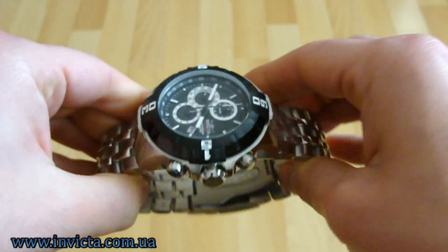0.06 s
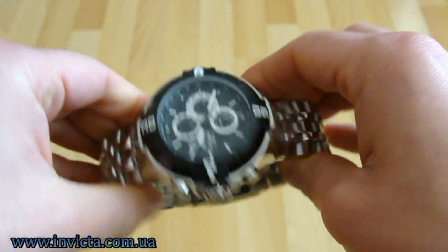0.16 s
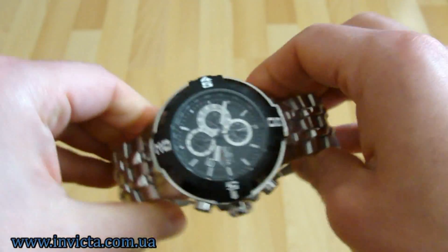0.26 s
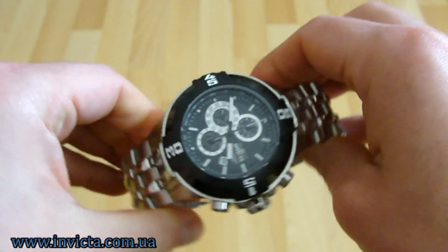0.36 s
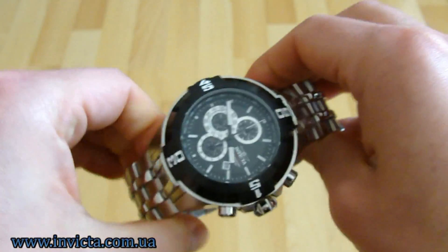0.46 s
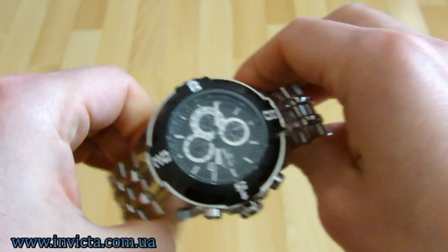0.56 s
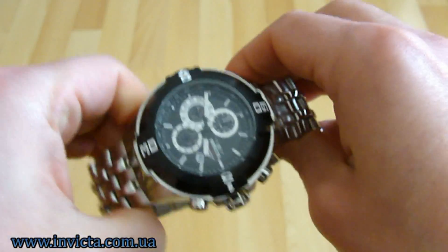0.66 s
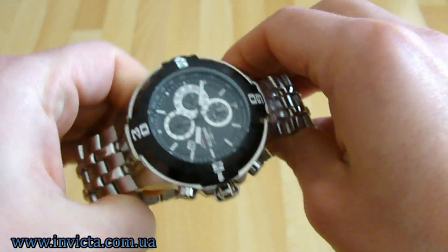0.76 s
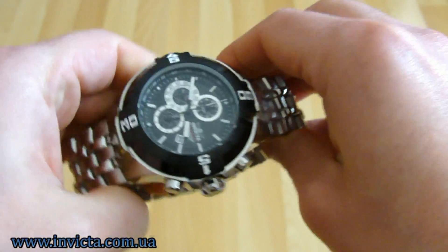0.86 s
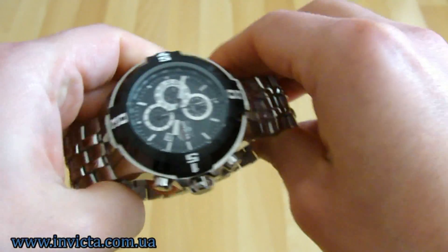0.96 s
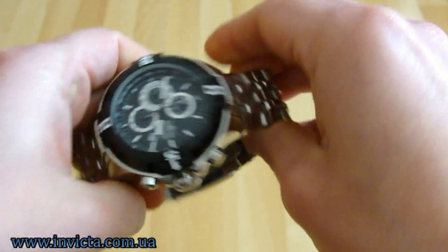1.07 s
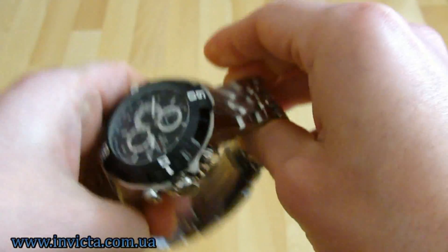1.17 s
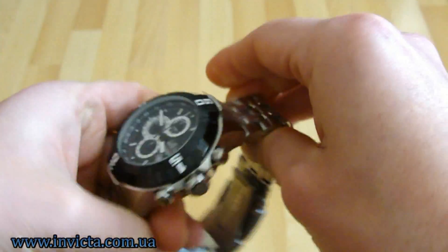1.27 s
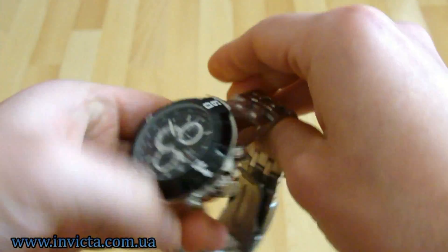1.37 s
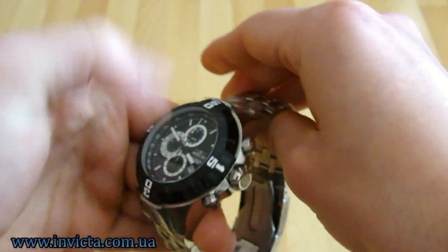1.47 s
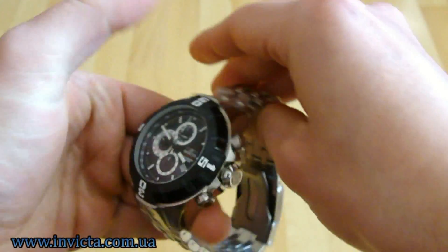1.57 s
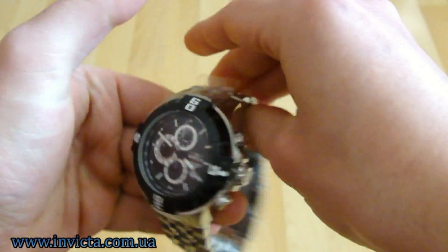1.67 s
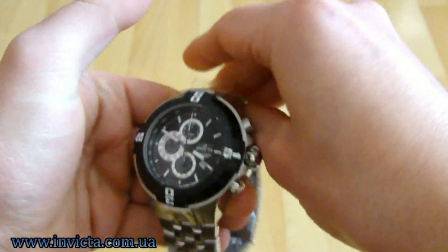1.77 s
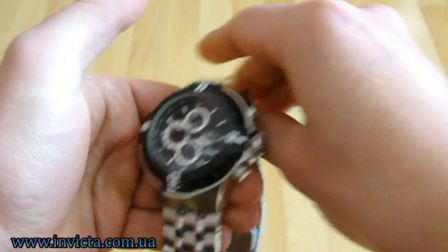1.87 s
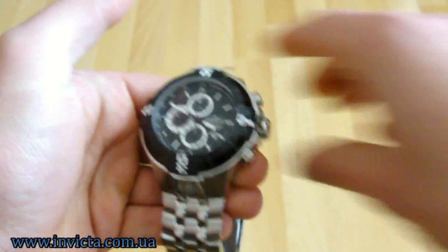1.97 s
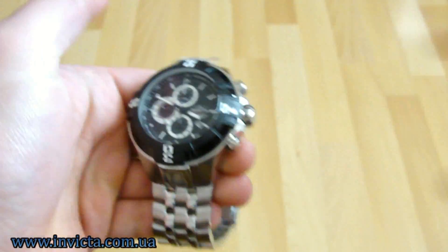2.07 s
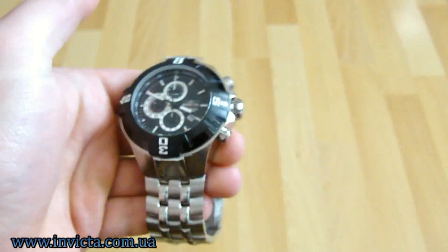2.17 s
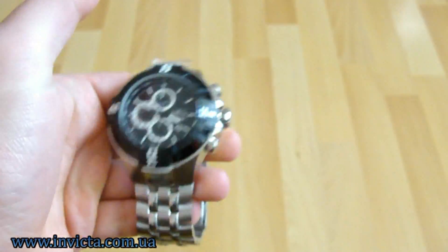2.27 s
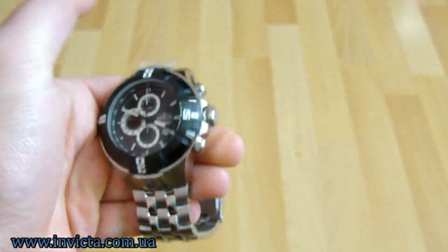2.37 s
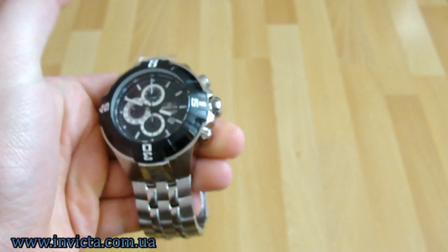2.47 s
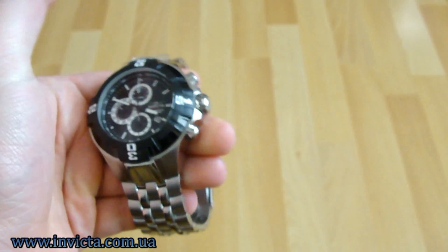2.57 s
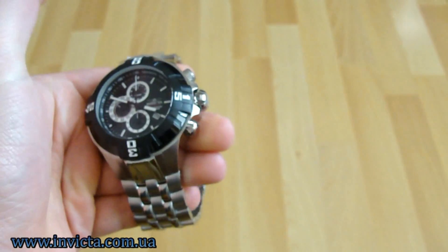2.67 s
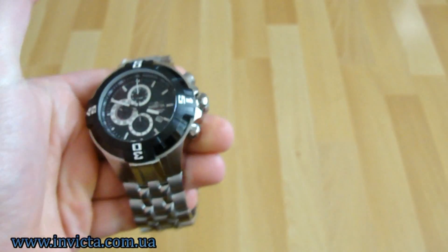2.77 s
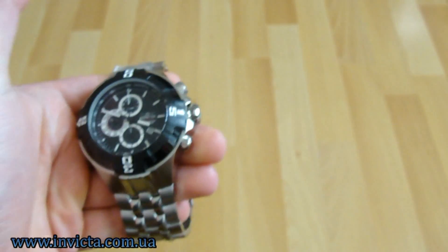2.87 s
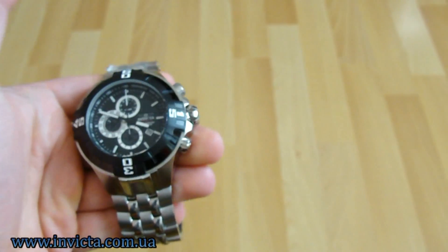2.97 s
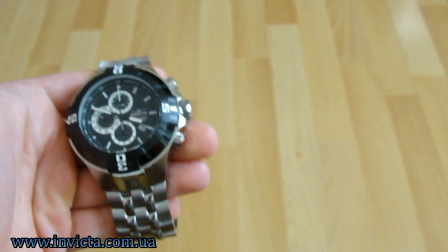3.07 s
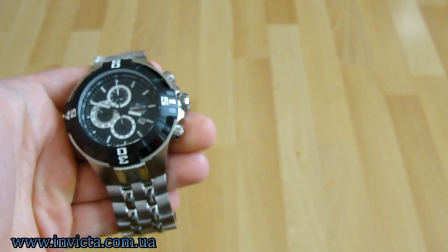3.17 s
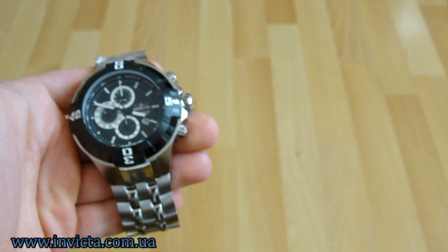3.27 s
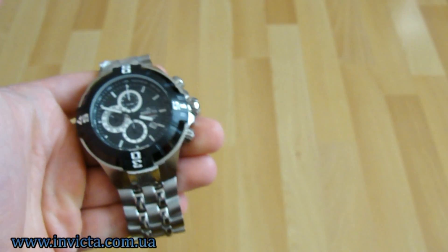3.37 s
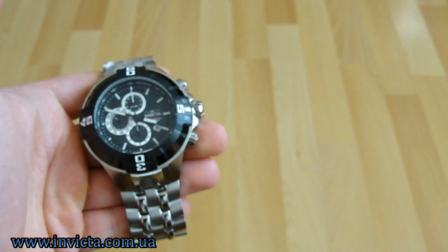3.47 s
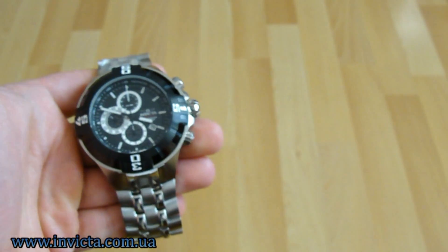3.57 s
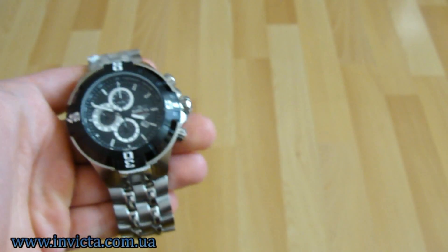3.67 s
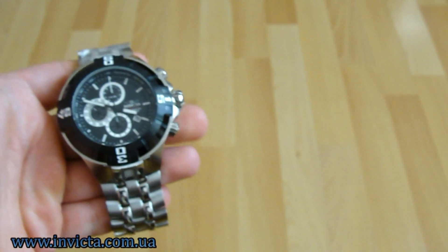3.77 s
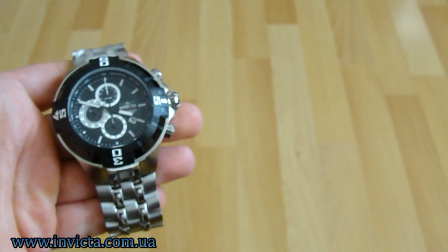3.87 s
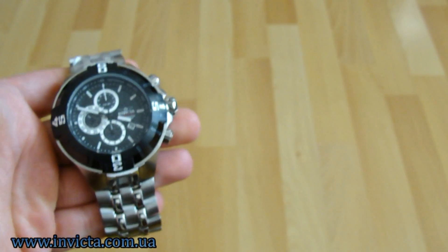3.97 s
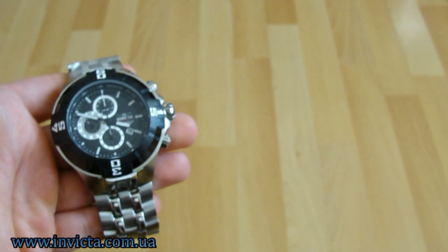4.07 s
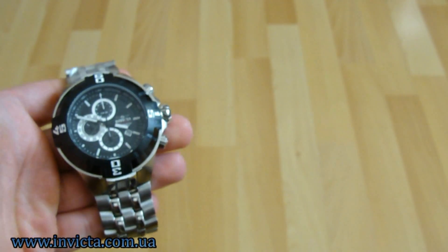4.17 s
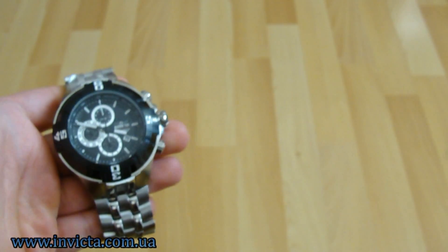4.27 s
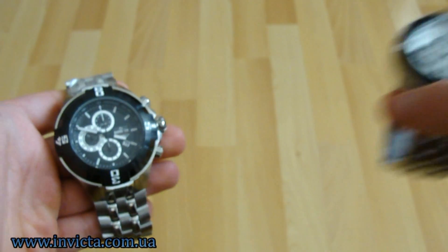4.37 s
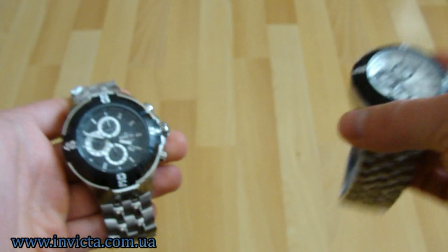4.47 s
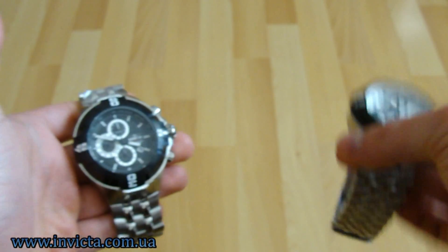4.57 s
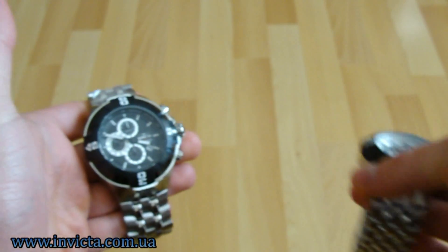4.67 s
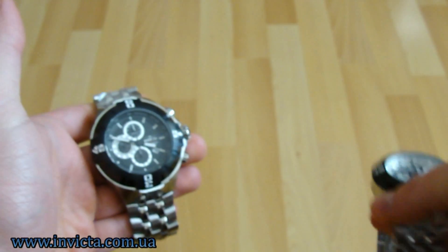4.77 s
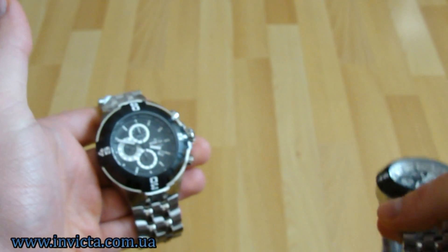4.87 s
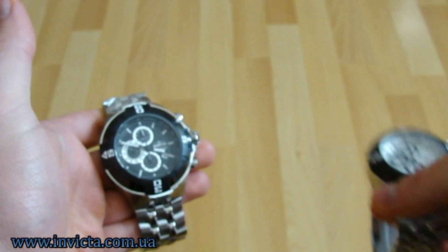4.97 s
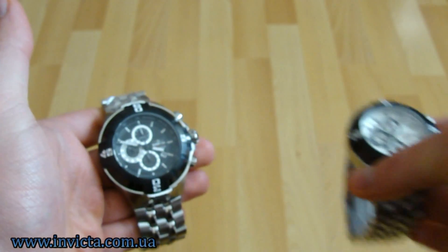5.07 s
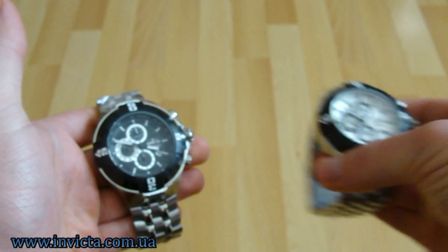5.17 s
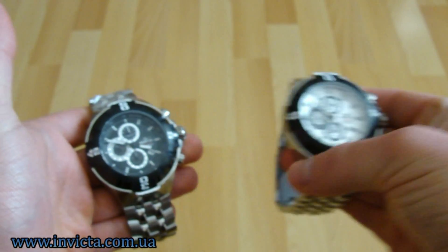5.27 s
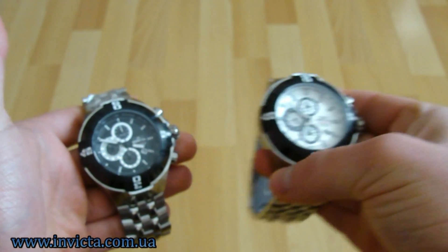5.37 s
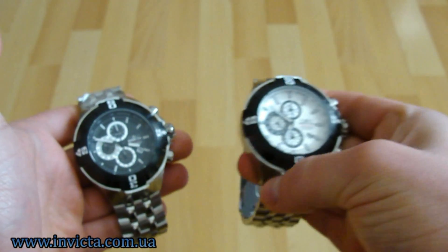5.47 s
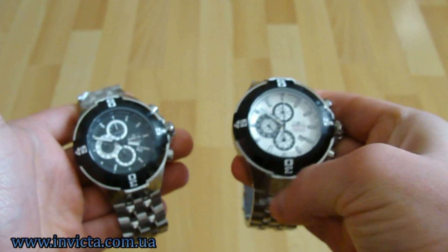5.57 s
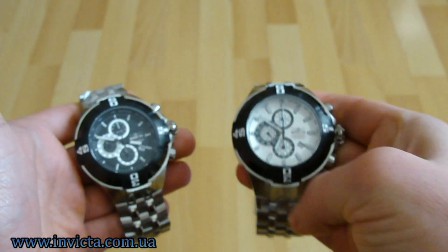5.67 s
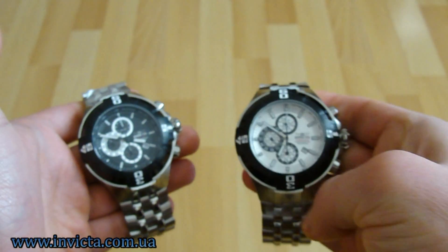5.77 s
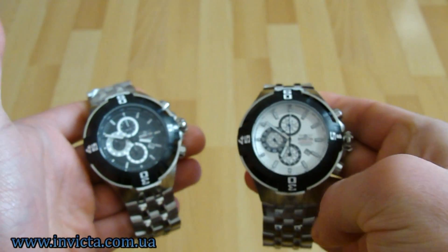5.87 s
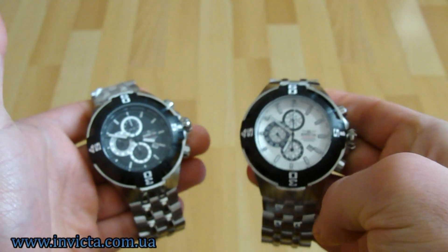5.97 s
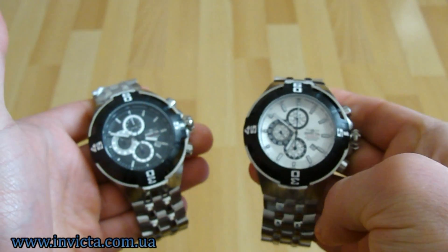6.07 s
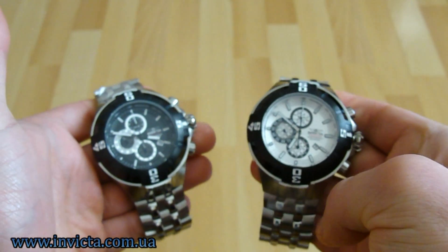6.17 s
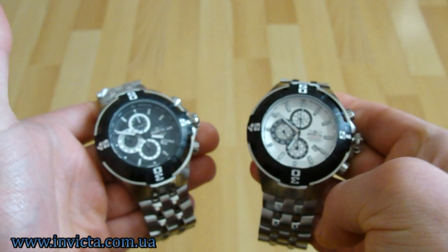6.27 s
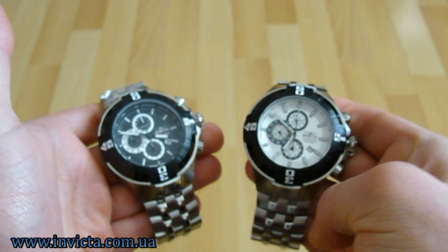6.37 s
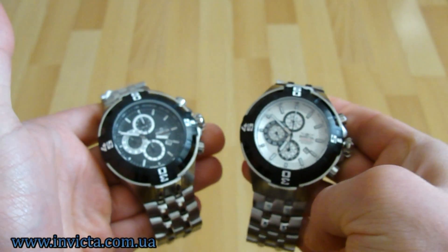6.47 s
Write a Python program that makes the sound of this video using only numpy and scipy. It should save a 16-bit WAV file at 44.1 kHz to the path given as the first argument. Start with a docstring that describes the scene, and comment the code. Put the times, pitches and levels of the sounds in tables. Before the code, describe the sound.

A steady machine hum and microphone hiss open the scene and continue throughout. At about 1.1 seconds, steel link watch bracelets begin to move in the hands: the links slide in a fine, high rattle and knock in short, damped clinks. These build to the loudest, sharpest cluster between 1.7 and 1.9 seconds. A brief rattle and clink follow near 2.1, and another near 2.5. Around 3 seconds there is a lull, with one soft bump of a watch case against the palm. From about 3.5 to 5.4 seconds comes a longer run of sliding rattles and clinks, with sharper clicks near 4.3, 4.4 and 4.8. It thins to a single clink near 5.7, a faint bump, and a last light clink and bump just after 6 seconds. Everything is close to a small mono microphone in a quiet room with slight, short reverberation.

```python
"""Steel link watch bracelets are handled close to a small mono microphone in a quiet room.
A steady machine hum and microphone hiss open the scene and lie under all of it. After a second the
bracelets are picked up: links slide in a fine rattle and knock in short damped clinks, loudest just
before 2 s, and the case bumps the palm. After a lull near 3 s they are turned in the hands in a longer
run of rattles and clinks, which thins out to a last clink and bump just after 6 s."""
import sys
import numpy as np
from scipy import signal
from scipy.fft import rfft, irfft, next_fast_len
from scipy.io import wavfile

SR = 44100
rng = np.random.default_rng(int(sys.argv[2]) if len(sys.argv) > 2 else 0)


def transcribe(signal):
    """Save signal, clipped to [-1, 1], as a 16-bit WAV file at the path in sys.argv[1]."""
    frames = np.atleast_2d(signal).T
    limited = np.clip(frames, -1, 1)
    pcm = np.round(limited * 32767).astype(np.int16)
    wavfile.write(sys.argv[1], SR, pcm)


N = 287607


def from_db(db):
    """Decibels to gain."""
    return 10 ** (np.asarray(db) / 20)


def ring(clicks, hz, t60):
    """A resonator: each click sets a decaying sine ringing."""
    r, w = from_db(-60 / (t60 * SR)), 2 * np.pi * hz / SR
    return signal.lfilter([0, np.sin(w)], [1, -2 * r * np.cos(w), r * r], clicks + 1e-18)


def damped(hz, t60, size=4000):
    """Decaying sines, one a row."""
    t = np.arange(size) / SR
    return np.sin(2 * np.pi * np.outer(hz, t)) * from_db(-60 * t / np.reshape(t60, (-1, 1)))


def add(out, start_s, sound):
    """Mix a sound in at its start time."""
    i = round(start_s * SR)
    out[i:i + len(sound)] += sound[:N - i]


# Tone curve of the background bed: frequency_hz, relative_db
BED_CURVE = [(15, -58), (25, -27), (212, -5.5), (247, -6), (303, -3.5), (381, -4), (651, -3), (740, -2),
             (1060, -2), (1850, -9), (2210, -10), (3770, -12), (11000, -20), (14300, -53), (22000, -120)]
# Narrow resonances of the machine: centre_hz, width_hz, lift_db
MACHINE_BANDS = [(602, 48, 2.5), (626, 23, 3.5), (1080, 45, 0.5), (1398, 37, 9.5), (1856, 130, 6.5),
                 (3266, 130, 5), (3770, 79, 8)]


def hum_and_hiss(level_db=-55):
    """Machine hum and microphone hiss: steady coloured noise with a few resonant bands."""
    size = next_fast_len(N)
    hz = np.maximum(np.arange(size // 2 + 1) * SR / size, 1)
    curve_hz, curve_db = np.transpose(BED_CURVE)
    eq_db = np.interp(np.log(hz), np.log(curve_hz), curve_db)
    for centre_hz, width_hz, lift_db in MACHINE_BANDS:
        eq_db += lift_db / (1 + (2 * (hz - centre_hz) / width_hz) ** 2)
    bed = irfft(rfft(rng.standard_normal(size)) * from_db(eq_db), size)[:N]
    return from_db(level_db) * bed / np.sqrt(np.mean(bed ** 2))


# Steel modes of the bracelet, voicing both rattle and clinks: pitch_hz, gain_db, t60_ratio
LINK_MODES = [(1800, -15, 0.44), (2265, -10.5, 2.5), (3030, -1, 1.26), (3360, -1.5, 1.08), (3950, 6, 0.69),
              (4570, 4, 0.68), (5200, 0, 0.91), (5900, -3.5, 1.9), (6600, -2, 1.27), (7150, -3.5, 1),
              (7760, -3, 1.04), (8820, 1.5, 0.47), (9320, -1.5, 1.07), (9970, -2, 1.3), (11250, 0.5, 1.03)]


def link_rattle(ticks, centre_hz, drop_db):
    """Each tiny tick rings one random link mode; modes away from the centre are turned down."""
    struck_mode = rng.integers(0, len(LINK_MODES), N)
    out = np.zeros(N)
    for k, (hz, mode_db, t60_ratio) in enumerate(LINK_MODES):
        off_centre = 1 - np.exp(-(np.log(hz / centre_hz) / .1) ** 2)
        low_cut_db = 7.3 * min(np.log2(hz / 4500), 0)
        gain = from_db(mode_db - drop_db * off_centre + low_cut_db)
        out += ring(ticks * (struck_mode == k) * gain, hz, .006 * t60_ratio)
    return out


# Restless hands, the rattle's envelope under the strokes: time_s, drive_db
HANDLING = [(1.05, -80), (1.15, -70), (1.35, -72), (1.6, -67), (2.05, -67), (2.25, -72), (2.85, -75),
            (2.9, -85), (3.38, -85), (3.45, -69), (3.79, -63), (3.93, -69), (4.08, -64), (4.18, -70),
            (4.45, -64), (4.8, -65), (4.97, -69), (5.1, -63), (5.3, -73), (5.45, -78), (5.85, -85)]
# Strokes of link sliding over link: full_level_at_s, hold_s, drive_db, centre_hz, off_centre_drop_db
STROKES = [(1.375, .02, -57, 6200, 6), (1.47, .05, -61, 6000, 5), (1.765, .03, -54, 6400, 8),
           (2.11, .058, -51, 6300, 5), (2.47, .035, -57, 6300, 13), (3.5, .04, -56, 8000, 8),
           (3.558, .035, -50, 5450, 12), (3.61, .03, -47, 5500, 10), (3.65, .02, -51, 5500, 12),
           (3.7, .015, -49, 6600, 19), (3.73, .04, -52, 5960, 9), (4.5, .04, -60, 5400, 6),
           (4.67, .03, -58, 6500, 5), (4.83, .085, -52.5, 6000, 5), (5.045, .025, -52, 4700, 10),
           (5.28, .005, -54, 7750, 20)]


def sliding_links(attack_s=.015, release_db_per_s=380, ticks_per_s=14000, strays_per_s=12):
    """Each stroke swells, holds and fades; between them the hands keep up a faint, ticking rattle."""
    t = np.arange(N) / SR
    drive_db = np.interp(t, *np.transpose(HANDLING))
    strays = (rng.random(N) < strays_per_s / SR) * from_db(drive_db + 22)
    centre_hz, drop_db = np.full(N, 5000.), np.full(N, 4.)   # colour between strokes
    for full_s, hold_s, peak_db, stroke_hz, stroke_drop_db in STROKES:
        swell = np.clip((t - full_s) / attack_s + 1, 1e-4, 1)
        fade_db = release_db_per_s * np.maximum(t - full_s - hold_s, 0)
        stroke_db = peak_db + 20 * np.log10(swell) - fade_db
        leads = stroke_db > drive_db   # the strongest movement sets the colour
        centre_hz[leads], drop_db[leads] = stroke_hz, stroke_drop_db
        drive_db = np.maximum(stroke_db, drive_db)
    contacts = rng.random(N) < ticks_per_s / SR
    accent_db = 1.1 * np.minimum(rng.exponential(1, N), 5)
    ticks = contacts * from_db(drive_db + accent_db) * rng.choice([-1, 1], N)
    return link_rattle(ticks + strays, centre_hz, drop_db)


# Clasp plates, free to ring on after a hard knock: pitch_hz, gain_db, t60_s
CLASP_MODES = [(2832, -42, .1), (3250, -44, .18), (3494, -42, .2), (3740, -45, .16), (7690, -48, .25),
               (7962, -48, .25)]
# Link knocking on link; the last five columns are relative trims:
# start_s, level_db, pitch_hz, pitch_lift_db, low_modes_db, high_modes_db, chatter_db, free_ring_db
CLINKS = [(1.146, -37, 9520, 2, -10, 5, -14, -32), (1.233, -37, 6030, 5, 5, 3, -16, -28),
          (1.295, -41, 6630, 2, -9, -4, -10, -30), (1.4196, -31, 5570, 0, -6, -11, -8, -30),
          (1.426, -33, 7760, 9, 1, 5, -8, -30), (1.432, -33, 5080, 2, -1, -1, -15, -30),
          (1.5495, -31, 6290, 5, -5, 2, -11, -30), (1.5716, -39, 4090, -2, -3, -6, -14, -30),
          (1.6987, -18.5, 10850, 10, -2, 2.5, -12, -30), (1.7094, -25, 6500, 12, -26, -10, -2, -34),
          (1.7453, -36, 7670, 2, -8, 4, -6, -30), (1.7502, -15, 7240, 0, -14, -12, -19, -34),
          (1.7528, -26.5, 8700, 7, -4, -2, -12, -25), (1.7669, -19, 6260, 2, -3, 15, -9, -35),
          (1.7737, -28, 6700, 5, -11, -11, -9, -30), (1.7887, -33, 7540, 2, -6, -1, -14, -30),
          (1.794, -36, 5170, 10, -16, -13, -8, -30), (1.8094, -30, 6500, 15, -15, -18, -10, -34),
          (1.8639, -34.5, 7700, 8, -10, -10, -3, -30), (1.8734, -11, 7870, 6, 6, -2, -20, -22),
          (1.8783, -7, 3430, 5, -1, 1, -16, -39), (2.0108, -33.5, 6550, 0, 0, -3, -15, -30),
          (2.0794, -20.5, 6590, 8.5, -2.5, -0.5, -13, -30), (2.4456, -28, 6250, 7, -11, 2, -11, -17),
          (2.7645, -36, 4880, 4.5, -8, -6.5, -9, -30), (3.4894, -40.5, 7840, 6, 2, 2, -13, -30),
          (3.505, -41, 8050, 6, -5, 5, -5, -30), (3.5542, -38, 5200, 8, -8, -15, -13, -30),
          (3.6127, -38, 5040, 2, -8, -2, -9, -30), (3.6919, -38, 6600, 5, -12, -2, -8, -30),
          (3.7215, -28.5, 6100, 2, -9, 3, -17, -30), (3.8904, -41, 6640, -3, -8, -13, -10, -28),
          (4.0158, -31.5, 6360, 0, -15, -1, -12, -30), (4.0574, -33, 5640, 4, -10, -2, -22, -30),
          (4.0653, -35, 5800, 2, -12, 3, -13, -30), (4.2358, -42, 4950, 4, -10, -12, -9, -30),
          (4.245, -41, 5000, 2, -8, -8, -14, -30), (4.2524, -38.5, 5080, 2, -15, 0, -7, -30),
          (4.264, -17, 5840, 0, -9, -8, -26, -42), (4.267, -32, 8300, 2, -10, 8, -15, -32),
          (4.3743, -34, 3800, -1, -4, -6, -16, -32), (4.3775, -18.5, 5640, 3, -6.5, -2.5, -16, -36),
          (4.6394, -39, 4390, 5, -2, -9, -12, -30), (4.659, -29, 7540, 8, -7, -5.5, -1, -22),
          (4.7007, -34.5, 11030, 2, -4, 0, -4, -30), (4.706, -38, 4740, 2, -4, -6, -4, -37),
          (4.7637, -37.5, 10900, -4, -7, -2, -4, -38), (4.787, -42, 4200, 4, 4, -13, -9, -30),
          (4.8114, -35, 5640, 0, -8, -1, -9, -30), (4.8153, -37, 4260, 8, -5, -14, -9, -30),
          (4.8337, -32, 7400, 5, -8, 2, -12, -25), (4.839, -22, 10400, 2.5, -2.5, 3.5, -11, -36),
          (4.8508, -31.5, 3920, 4, -3, 1, -4, -30), (4.8653, -28, 5340, -3, -14, 2, -11, -32),
          (4.8898, -30.5, 5300, 0, -8, 2, -3, -32), (4.8964, -35, 4400, -1, -3, -10, -6, -30),
          (4.9086, -31, 6650, 0, -5, 5, -3, -17), (5.0341, -35, 6570, 10, -25, -5, -1, -30),
          (5.0421, -28, 6650, 2, -4, -10, -1, -32), (5.0525, -26.5, 7150, 3, -4, -6, -12, -34),
          (5.058, -33, 6660, -2, -1, -2, 0, -30), (5.1259, -41, 6760, 2, -9, -10, -8, -32),
          (5.3702, -34, 6200, 0, -7, -5, -8, -30), (5.3817, -32.5, 7000, 5, 0, 0.5, -9, -32),
          (5.6551, -31.5, 6650, -4, -10.5, -14.5, -7.5, -20), (6.1148, -36, 4820, 2, 8, 1, -5.5, -30)]


def link_clinks(low_hz=4200, high_hz=7500, chatter_before_s=.002, chatter_after_s=.007):
    """A knock strikes all link modes, loose links chatter around it, and a free link and clasp ring on."""
    out, clasp_blows = np.zeros(N), np.zeros(N)
    hz, mode_db, t60_ratio = np.transpose(LINK_MODES)
    polarity = (-1.) ** np.arange(len(hz))
    variations = rng.standard_normal((len(CLINKS), 2, len(hz)))   # no two links alike
    touches = rng.random((len(CLINKS), 2, 24))
    lead, span = round(chatter_before_s * SR), round((chatter_before_s + chatter_after_s) * SR)
    for clink, (scatter, detune), (when, force) in zip(CLINKS, variations, touches):
        start_s, level_db, pitch_hz, lift_db, low_db, high_db, chatter_db, free_ring_db = clink
        t60 = .0082 + .0002 * chatter_db   # tighter links damp each other sooner
        tilt_db = np.where(hz < low_hz, low_db, np.where(hz > high_hz, high_db, 0))
        strengths = from_db(mode_db + tilt_db + 1.5 * scatter) * polarity
        knock = strengths @ damped(hz * (1 + .029 * detune), t60 * t60_ratio, size=800)
        knock += from_db(lift_db + tilt_db.max()) * damped([pitch_hz], .92 * t60, size=800)[0]
        touch_gain = from_db(chatter_db - 7.4 * when)   # later touches are weaker
        contacts = np.zeros(span + 1)
        contacts[(when * span).astype(int)] = touch_gain * (2 * force - 1)
        contacts[lead] = 1   # the main hit
        cluster = np.convolve(contacts, knock)
        add(out, start_s - chatter_before_s, from_db(level_db) * cluster / np.abs(cluster).max())
        add(out, start_s, from_db(level_db + free_ring_db) * damped([pitch_hz], t60=.08)[0])
        clasp_blows[round(start_s * SR)] = from_db(level_db + low_db)
    for plate_hz, gain_db, t60 in CLASP_MODES:
        out += from_db(gain_db) * ring(clasp_blows, plate_hz, t60)
    low_cut = signal.butter(6, 1800, "high", fs=SR, output="sos")   # small parts radiate no bass
    return signal.sosfilt(low_cut, out)


# Watch case bumping the palm: start_s, level_db, pitch_hz, t60_s
CASE_BUMPS = [(1.699, -39, 248, 0.0078), (1.7465, -37.5, 300, 0.0065), (2.919, -46.5, 345, 0.055),
              (4.264, -41, 1500, .005), (4.839, -43, 1700, .01), (5.045, -41, 1600, .015),
              (5.868, -44.5, 920, 0.022), (6.1145, -46, 1080, 0.046)]


def case_bumps():
    """The case meets soft skin: one low, quickly damped tone for each bump."""
    out = np.zeros(N)
    for start_s, level_db, pitch_hz, t60_s in CASE_BUMPS:
        add(out, start_s, from_db(level_db) * damped([pitch_hz], t60_s)[0])
    return out


def room_reverb(direct, wet_db=-15.5, t60_s=.28, predelay_s=.004):
    """Dense reflections after a short gap, dying away evenly, duller than the direct sound."""
    t = np.arange(SR // 2) / SR
    tail = rng.standard_normal(len(t)) * from_db(-60 * t / t60_s) * (t > predelay_s)
    tail = signal.lfilter([.5], [1, -.4], tail)   # soften the treble
    return from_db(wet_db) * signal.fftconvolve(direct, tail / np.sqrt(np.sum(tail ** 2)))[:N]


def scene():
    """Bracelets and their reverb over the background bed; one microphone feeds both channels."""
    watches = link_clinks() + sliding_links() + case_bumps()
    mono = watches + room_reverb(watches) + hum_and_hiss()
    return np.array([mono, mono])


def record(dry):
    """A low-rate converter's linear-phase filter walls off the treble; a steep high cut follows."""
    converter = signal.firwin(1201, 11000, window=("kaiser", 5), fs=SR)
    band_limited = signal.fftconvolve(dry, [converter], "same", axes=1)
    high_cut = signal.cheby2(12, 40, 12059, fs=SR, output="sos")
    return signal.sosfilt(high_cut, band_limited)


dry = scene()
out = record(dry)
transcribe(out)
```